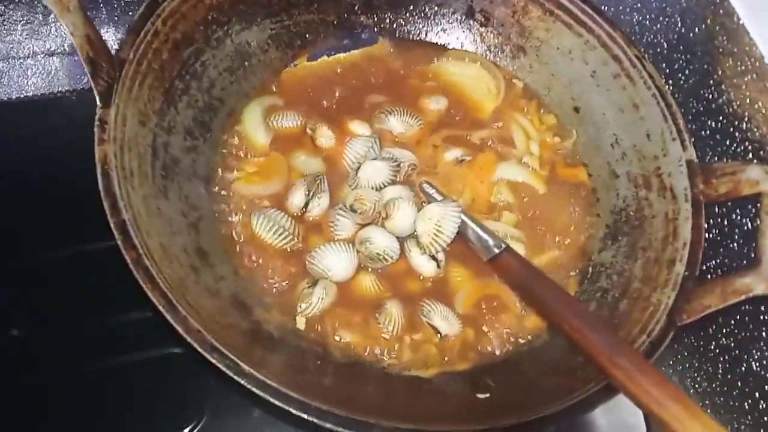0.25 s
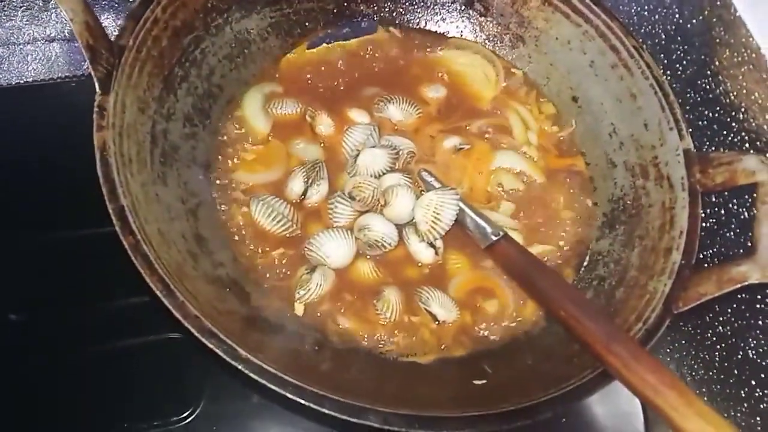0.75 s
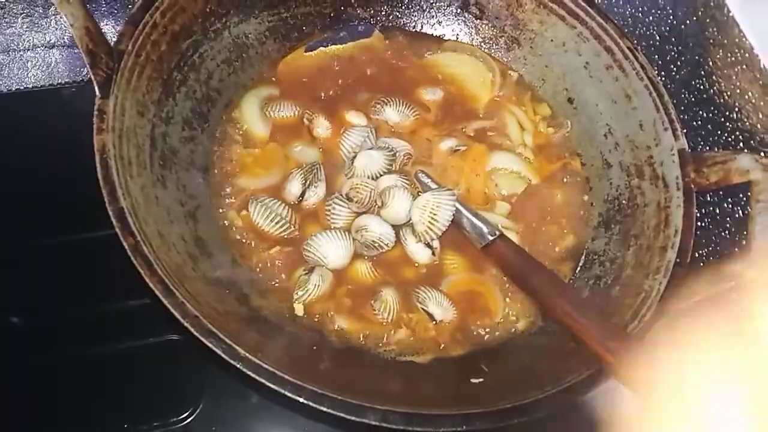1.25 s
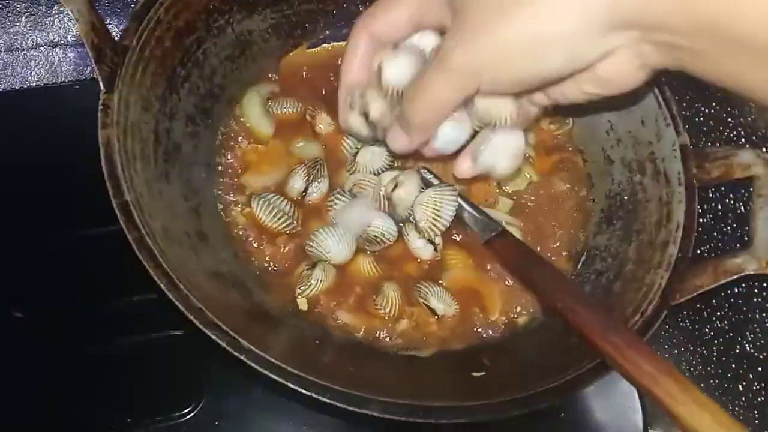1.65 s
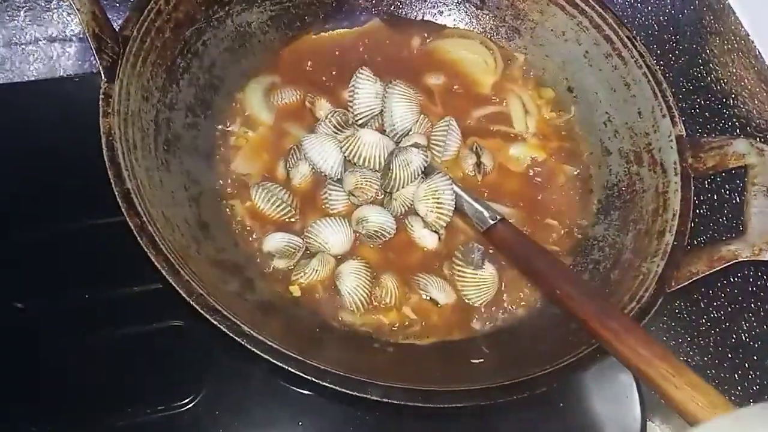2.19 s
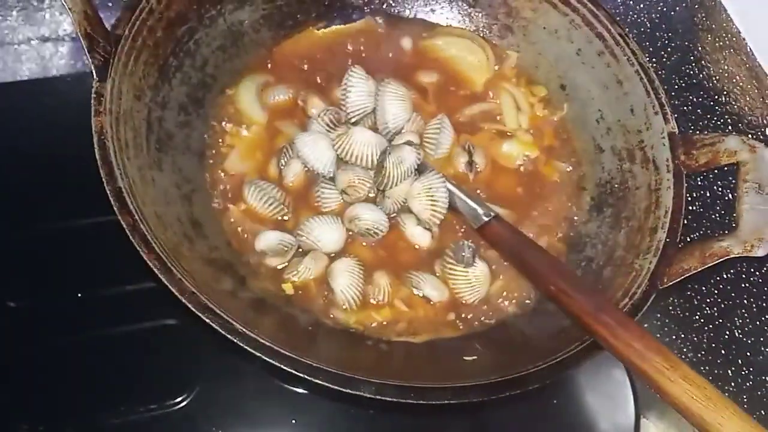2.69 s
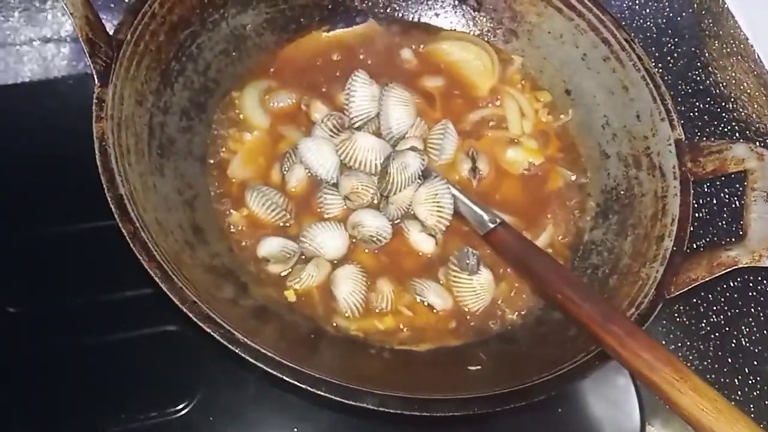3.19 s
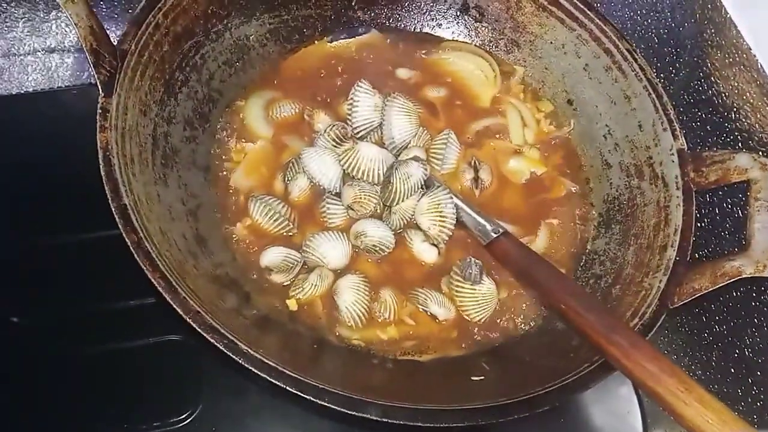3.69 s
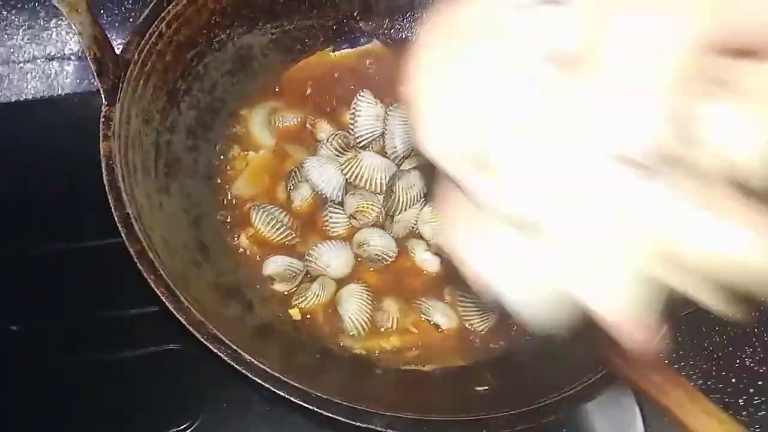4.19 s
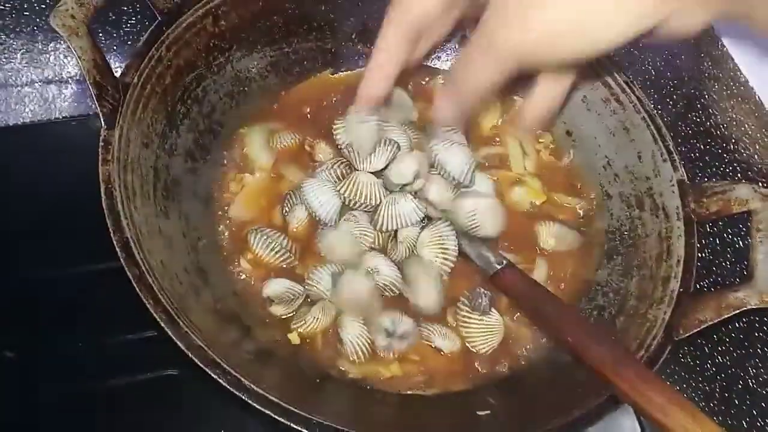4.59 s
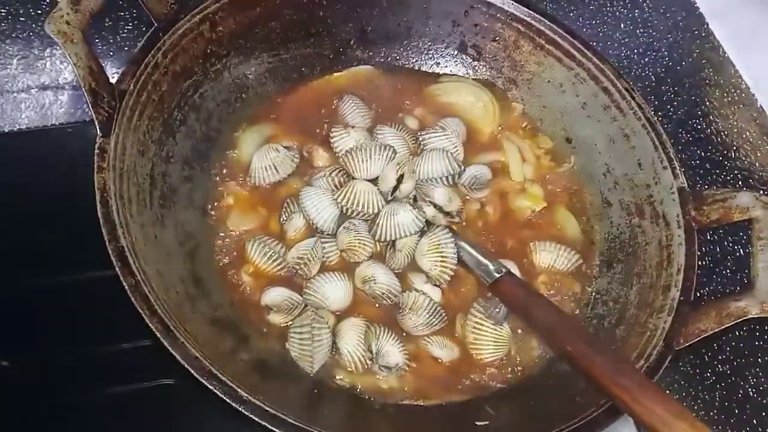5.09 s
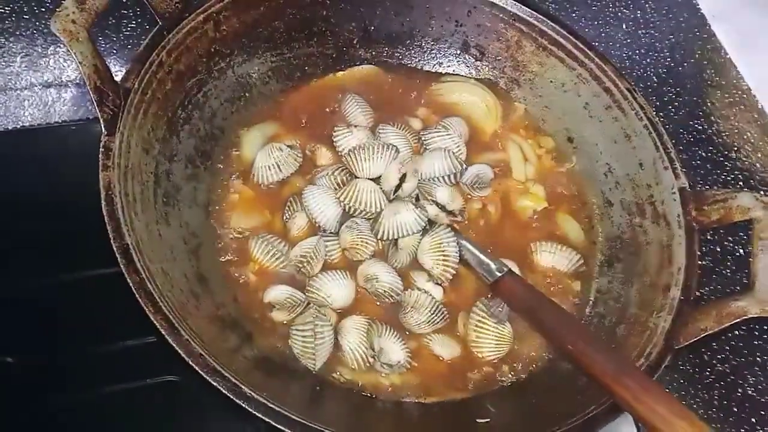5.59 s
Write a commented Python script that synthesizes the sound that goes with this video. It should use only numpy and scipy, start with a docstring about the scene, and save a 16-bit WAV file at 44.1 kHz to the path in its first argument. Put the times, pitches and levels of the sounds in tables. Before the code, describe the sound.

In a small kitchen, a hand digs through cockle shells in a hollow bowl with sharp clacks and dull knocks. After a brief lull of simmering, a handful clatters into a sauce-filled wok. Scooping resumes, a second handful drops with a faint metallic ping, then more digging. Close microphone, short room reverberation.

```python
"""Sauce simmers in a wok in a small kitchen over faint tones while a hand scoops cockles from a bowl:
contacts ring small shells for milliseconds and knock the hollow bowl, which also bumps the counter.
Shells click in the raised hand, then clatter into the sauce-damped wok with low plops.
A second handful is scooped, carried and dropped, one shell pings on the spatula, and scooping resumes.
Damped sines make the rings and bubbles, shaped noise bursts the cracks and thuds."""
import sys
import numpy as np
from scipy import signal
from scipy.fft import rfft, irfft
from scipy.io import wavfile
from scipy.ndimage import uniform_filter1d, minimum_filter1d

SR = 44100
rng = np.random.default_rng(int(sys.argv[2]) if len(sys.argv) > 2 else 0)


def persist_wave(psi):
    """Save psi, clipped to +-1, as 16-bit WAV."""
    counts = np.round(np.clip(psi, -1, 1) * 32767).astype(np.int16)
    wavfile.write(sys.argv[1], SR, np.atleast_2d(counts).T)


N = 257984
T = np.arange(N) / SR
TOP_HZ = 15700


def amp(db):
    """Decibels to gain."""
    return 10 ** (np.asarray(db) / 20)


def unit(x):
    """Scale each row to unit energy."""
    return x / np.sqrt(np.sum(x ** 2, axis=-1, keepdims=True))


def at_hz(points, hz):
    """Read (Hz, value) points on a log-frequency axis."""
    f, value = np.transpose(points)
    return np.interp(np.log(np.maximum(hz, 1)), np.log(f), value)


def colour(points, size=2048):
    """Minimum-phase impulse response with the given spectrum shape, unit energy."""
    log_gain = np.log(amp(at_hz(points, np.fft.rfftfreq(size, 1 / SR))))
    cepstrum = irfft(log_gain)
    # fold the cepstrum to make the response causal
    cepstrum[1:size // 2] *= 2
    cepstrum[size // 2 + 1:] = 0
    return unit(irfft(np.exp(rfft(cepstrum))))


def through(x, response):
    """Pass a sound through an impulse response."""
    return signal.fftconvolve(x, response)[:N]


def high_pass(x, hz):
    """Second-order low cut."""
    return signal.sosfilt(signal.butter(2, hz, "high", fs=SR, output="sos"), x)


def place(times, waves):
    """Sum short waves (one a row) at their start times."""
    index = np.maximum(times * SR, 0).astype(int)[:, None] + np.arange(waves.shape[1])
    return np.bincount(index.ravel(), waves.ravel(), N)[:N]


def bursts(n, t60, size):
    """Decaying noise bursts of unit energy, one a row."""
    decay = amp(-60 * np.arange(size) / SR / t60)
    return unit(rng.standard_normal((n, size)) * decay)


def ring(hz, t60, size):
    """Damped sines of unit energy, one a row."""
    t = np.arange(size) / SR
    decay = np.exp(-np.log(1000) * t / np.reshape(t60, (-1, 1)))
    return unit(np.sin(2 * np.pi * hz[:, None] * t) * decay)


def gesture(start, length, rise, sag, settle):
    """Level/dB of a hand movement: rises up to start, sags (swells if negative), settles; all in dB/s."""
    t = T - start
    return -rise * np.maximum(-t, 0) - sag * np.clip(t, 0, length) - settle * np.maximum(t - length, 0)


# simmering sauce spectrum: f/Hz, relative level/dB
SIMMER_SPECTRUM = [(30, 6), (95, 0), (150, -25), (380, -18), (530, 1.5), (750, -17.5), (1400, -10),
                   (2400, 0.5), (3500, -12), (5300, 2.5), (8000, -13.5), (10500, -11.5), (16000, -30)]
SIMMER_RMS_DB = -46.5
# larger bubbles: t/s, level/dB, f/Hz
BUBBLES = [(2.012, -27, 1020), (3.955, -18, 2000), (4.148, -32, 1500)]


def sauce(count=9000, surge_db=2.5):
    """Tiny bubbles burst in surges, each at its own pitch, over the stove's rush; a few larger ones pop."""
    sizes = amp(8 * np.minimum(rng.standard_normal((count, 1)), 2.0))
    times = rng.random(count) * N / SR
    pops = place(times, sizes * ring(rng.uniform(900, TOP_HZ, count), 0.002, size=200))
    steps = np.arange(0, N / SR, .03)
    surge = amp(surge_db * np.interp(T, steps, rng.standard_normal(len(steps))))
    rush = unit(rng.standard_normal(N))
    fizz = through(unit(surge * pops) + rush, colour(SIMMER_SPECTRUM))
    t, db, hz = np.transpose(BUBBLES)
    larger = place(t, amp(db)[:, None] * ring(hz, 0.021, size=1500))
    return amp(SIMMER_RMS_DB) * np.sqrt(N) * unit(fizz) + larger


# background tones: f/Hz, level/dB, t60/s
HUM_TONES = [(91.1, -73.5, 0.4), (508, -65, 2), (569, -60, 4.5)]
# swells of one further tone: middle t/s, half length/s (to 1/e), peak level/dB
SWELLS = [(1.192, 0.022, -48), (4.06, 0.037, -49), (4.202, 0.016, -52)]
SWELL_HZ = 586


def hum():
    """Noise-driven resonances waver faintly in the background; a further tone swells now and then."""
    hz, db, t60 = np.transpose(HUM_TONES)
    tones = through(rng.standard_normal(N), amp(db) @ ring(hz, t60, size=50000))
    swell = sum(amp(peak_db) * np.exp(-((T - middle) / width) ** 2) for middle, width, peak_db in SWELLS)
    return tones + swell * np.sin(2 * np.pi * SWELL_HZ * T)


# typical shell modes: f/Hz, relative level/dB, t60/s, spread between shells/octaves
SHELL_MODES = [(2538, -6, 0.012, 0.12), (3447, -12.5, 0.016, 0.225), (4680, -3, 0.0042, 0.23),
               (5520, 0, 0.012, 0.13)]
# contact crack spectrum: f/Hz, relative level/dB
CRACK_SPECTRUM = [(60, -41), (1000, -21), (2000, 0.5), (6200, 6.5), (8000, -7.5), (10500, -7),
                  (16000, -26.5)]


def shells(times, sizes, crack_db, variety=1):
    """Shell on shell: a crack, and brief modes whose pitch and share differ with every contact."""
    waves = 0
    for hz, db, t60, spread in SHELL_MODES:
        chance = variety * rng.standard_normal((len(times), 2))
        own_hz = hz * 2 ** (spread * chance[:, 0])
        share = amp(db + 4.4 * chance[:, 1:]) * rng.choice([-1, 1], (len(times), 1))
        waves = waves + share * ring(own_hz, t60, size=400)
    # edge contacts crack sharply, cushioned ones hardly at all
    sharpness = amp(4 * variety * rng.standard_normal(len(times)).clip(-2, 1.5))
    cracks = place(times, (sizes * sharpness)[:, None] * bursts(len(times), 0.0073, size=400))
    rings = high_pass(place(times, sizes[:, None] * unit(waves)), 1320)  # small shells radiate no bass
    # a wet contact lasts a moment, which softens the top of the ring
    rings = signal.sosfilt(signal.butter(2, 8000, fs=SR, output="sos"), rings)
    return rings + amp(crack_db) * through(cracks, colour(CRACK_SPECTRUM))


def knocks(times, db, rattle_db, rattle_s, count=4):
    """One hard contact each, passed on at once to the neighbouring shells."""
    late = (np.arange(count) + rng.random((len(times), count))) / count
    sizes = amp(db + rattle_db)[:, None] * unit(amp(-7 * late))
    after = times[:, None] + 0.000984 + np.reshape(rattle_s, (-1, 1)) * late
    first = shells(times, amp(db), crack_db=-3.0, variety=0.29)
    return first + shells(after.ravel(), sizes.ravel(), crack_db=-1.5)


# dull vessel thud spectrum: f/Hz, relative level/dB
THUD_SPECTRUM = [(30, -50), (150, -36), (320, -8), (430, -6), (900, -3.5), (2000, -8.5), (9000, -31)]


def vessel(times, sizes, modes, thud_db, count=3):
    """Contacts knock a vessel: its modes ring over a dull thud, a little differently at each spot."""
    hz, db, t60 = np.transpose(modes)
    pushes = sizes[:, None] * bursts(len(times), 0.003, size=200)
    out = amp(thud_db) * through(place(times, pushes), colour(THUD_SPECTRUM))
    for spot in range(count):
        chance = rng.standard_normal((2, len(hz)))
        weights = amp(db + 1.53 * chance[0]) * rng.choice([-1, 1], len(hz))
        body = unit(weights @ ring(hz * (1 + 0.022 * chance[1]), t60, size=20000))
        blows = place(times[spot::count], pushes[spot::count])
        out = out + through(blows, high_pass(body, 1.45 * hz[0]))
    return out


def struck(times, db, note_hz, modes, focus_db, thud_db):
    """Firm blows on a vessel: modes lose focus_db for every octave away from the favoured note."""
    hz, mode_db, t60 = np.transpose(modes)
    chance = rng.standard_normal((len(times), 2, len(hz)))
    octaves_off = abs(np.log2(hz / note_hz[:, None]))
    weights = amp(mode_db - focus_db * octaves_off + 2.5 * chance[:, 0]) * np.sign(chance[:, 1])
    sizes = amp(db)[:, None]
    body = place(times, sizes * unit(weights @ ring(hz, t60, size=7000)))
    thud = through(place(times, sizes * bursts(len(times), 0.0062, size=500)), colour(THUD_SPECTRUM))
    return high_pass(body, 1.93 * hz[0]) + amp(thud_db) * thud


CONTACTS_PER_S = 520


def tumble(clatter_db, push_db, modes, shell_db, thud_db, scuff_db, scatter_db):
    """Hundreds of small contacts a second, of varied hardness, knock a vessel; wet shells scuff along."""
    count = int(CONTACTS_PER_S * N / SR)
    times = (np.arange(count) + 2 * rng.random(count) - 1) / CONTACTS_PER_S
    # one shell sets off the next, so contacts in a row are alike in hardness
    chance = unit(uniform_filter1d(rng.standard_normal(count), size=2)) * np.sqrt(count)
    size = unit(amp(scatter_db * np.minimum(chance, 1.7))) * np.sqrt(N)
    clatter = size * amp(np.interp(times, T, clatter_db) + shell_db)
    push = size * amp(np.interp(times, T, push_db))
    # scuffing grows faster than the clatter
    scuff_noise = amp(clatter_db) ** 2.04 * rng.standard_normal(N)
    scuff = amp(scuff_db) * through(scuff_noise, colour(CRACK_SPECTRUM))
    contacts = shells(times, clatter, crack_db=-5.5) + vessel(times, push, modes, thud_db)
    return contacts + high_pass(scuff, 2100)


# loaded bowl modes: f/Hz, relative level/dB, t60/s
BOWL_MODES = [(262, -10, 0.13), (401.7, -3, 0.058), (439.3, -1.5, 0.12), (491.4, -0.5, 0.059),
              (549, -2.5, 0.041), (603, -8, 0.15), (894, -1, 0.041), (1013, -2, 0.048), (1155, -5.5, 0.08),
              (1600, -7, 0.085), (1693, -3.5, 0.096), (2030, -4, 0.04), (2473, 5, 0.01)]
# finger strokes: start t/s, length/s, relative clatter level/dB, bowl push re clatter/dB
DIGS = [(0.0, 0.045, -20, -2.5), (0.121, 0.24, -23, -6), (0.298, 0.08, -24.5, -2.5),
        (0.456, 0.048, -27.5, -10.5), (0.577, 0.048, -21.5, -4), (0.704, 0.11, -17.5, -17.5),
        (0.868, 0.085, -26, -6), (2.218, 0.32, -17, -9), (2.589, 0.09, -16.5, -13),
        (2.757, 0.18, -18, -8.5), (3.028, 0.093, -25, -11), (3.186, 0.04, -21, -8),
        (3.335, 0.1, -28, -11.5), (3.497, 0.053, -21, -12), (3.765, 0.008, -31, -2.5),
        (5.012, 0.06, -17, -12.5), (5.143, 0.057, -16.5, -10.5), (5.257, 0.11, -19.5, -9),
        (5.321, 0.17, -17.5, -10.5), (5.54, 0.36, -18, -10), (5.793, 0.018, -15, -4.5)]
# quick onset, slight swell (negative sag), then the heap comes to rest
DIG_RISE_DB_PER_S, DIG_SAG_DB_PER_S, DIG_SETTLE_DB_PER_S = 740, -2.5, 257
# shell on bowl wall: t/s, relative level/dB, bowl re shell/dB, favoured bowl f/Hz, rattle length/s
BOWL_KNOCKS = [(.038, -3.5, -1.5, 840, 0.0093), (0.0977, -8, 3, 1000, 0.0087),
               (0.157, -6.5, 0, 500, 0.0076), (0.2158, -6.5, -3.5, 1120, 0.0073),
               (.316, -8, 5.5, 480, 0.0075), (.341, -9.5, 9, 447, 0.0084), (0.3742, -8.5, 0, 450, 0.0071),
               (.4, -6.5, 2.5, 500, 0.0053), (0.528, -12.5, 2.5, 1010, 0.0092),
               (0.561, -8, -1.5, 920, 0.0057), (0.623, -15, -2, 550, 0.0038),
               (0.631, -10.5, 4, 1600, 0.0078), (0.655, -3.5, -1.5, 600, 0.005),
               (0.7129, -15, 13, 605, 0.0077), (0.83, -9, 4, 880, 0.0035), (0.862, -12.5, 1.5, 800, 0.0057),
               (0.8816, -8.5, -3, 960, 0.0068), (1.373, -28, -2.5, 1060, .005),
               (2.1994, -9.5, -5, 930, 0.016), (3.208, -10.5, -13, 1000, 0.0051),
               (3.5148, -15.5, 2, 452, 0.0024), (3.5957, -7.5, -10.5, 1010, 0.015),
               (3.7301, -23, 8, 1020, 0.0069), (3.774, -15.5, 3, 1000, 0.012), (3.797, -11, 2, 1050, 0.012),
               (3.97, -24, -0.5, 950, 0.0037), (4.962, -15, 1.5, 754, 0.018), (5.279, -4.5, -4, 725, 0.01)]


def scooping(body_db=0.0):
    """The hand digs through the shells in the bowl, stroke by stroke, and some knock its wall."""
    strokes = np.array([db + gesture(start, length, DIG_RISE_DB_PER_S, DIG_SAG_DB_PER_S, DIG_SETTLE_DB_PER_S)
                        for start, length, db, _ in DIGS])
    pushes = strokes + np.array(DIGS)[:, 3:] + body_db
    rattle = tumble(strokes.max(axis=0), pushes.max(axis=0), BOWL_MODES,
                    shell_db=-5.0, thud_db=-4.5, scuff_db=7.0, scatter_db=3.5)
    t, db, bowl_db, note_hz, rattle_s = np.transpose(BOWL_KNOCKS)
    wall = struck(t, db + bowl_db + 11.0, note_hz, BOWL_MODES, focus_db=11, thud_db=-4.5)
    return rattle + knocks(t, db + 5.5, rattle_db=6.5, rattle_s=rattle_s) + wall


# heap shoved along the bowl wall: middle t/s, length/s, relative level/dB, favoured f/Hz
SHOVES = [(0.059, 0.072, -24.5, 490), (0.36, 0.078, -29, 454), (0.743, 0.041, -26, 865),
          (2.427, 0.32, -28, 900), (2.48, 0.1, -27, 534), (2.899, 0.11, -23, 564), (5.371, 0.082, -25, 860),
          (5.421, 0.12, -23.5, 470), (5.634, 0.15, -25, 504), (5.809, 0.08, -29, 500)]


def shoving(count=24):
    """Ribbed shells stick and slip on the bowl wall and draw out the hollow modes near one note."""
    middle, length, db, note_hz = np.transpose(SHOVES)[:, :, None]
    along = (np.arange(count) + rng.random((len(SHOVES), count))) / count
    sizes = amp(db) * unit(np.sqrt(np.sin(np.pi * along))) * np.sqrt(length * SR)
    slips = middle + length * (along - .5)
    slip_db = 20 * np.log10(sizes.ravel())
    return struck(slips.ravel(), slip_db, np.repeat(note_hz, count), BOWL_MODES, focus_db=11.5, thud_db=-21)


# hard shell-on-shell clacks: t/s, relative level/dB, note f/Hz
CLACKS = [(0.281, -7.5, 2820), (0.435, -3.5, 5500), (0.453, 1.5, 2760), (0.5081, -3, 5400),
          (0.782, -4, 5740), (0.9358, -7, 2730), (1.035, -19.5, 2450), (1.6217, -16, 5100),
          (1.635, -9, 2450), (1.653, -13, 6550), (1.665, -3, 4940), (1.688, -3.5, 5440), (1.712, -10, 2320),
          (1.726, -10, 5600), (1.745, -7, 2380), (1.762, -8.5, 4840), (1.773, -6, 5470),
          (1.817, -0.5, 5180), (2.558, -2, 5610), (2.728, 1.5, 5370), (2.9744, -2, 5700),
          (3.0077, -4.5, 5980), (3.085, -6.5, 2430), (3.119, -9.5, 5560), (3.1315, -5.5, 4320),
          (3.2925, -5, 2440), (3.318, -5, 5300), (3.356, -7, 2590), (3.396, -12.5, 5000), (3.55, -7, 5500),
          (3.6499, -7, 4770), (3.673, -7.5, 6050), (3.68, -9, 5400), (3.7302, -4, 5620), (4.324, -2, 5800),
          (4.35, -3.5, 5370), (4.3654, -3.5, 5100), (4.413, -8, 5660), (4.424, -7, 5430), (4.472, -5, 2400),
          (4.505, -6, 5200), (4.539, -10, 4970), (4.564, -10, 5700), (4.613, -14.5, 5660),
          (4.624, -12, 5360), (4.7338, -6.5, 5330), (5.003, -7, 4400), (5.153, -1.5, 5620),
          (5.17, -11, 5900), (5.201, 4.5, 5940), (5.329, -3, 5530), (5.366, 3, 5830), (5.443, -9, 5800),
          (5.483, -21, 5800), (5.5326, -2, 5600)]
CLACK_NOTE_DB, CLACK_BODY_DB, CLACK_T60_S = 7, -6, 0.013  # levels re clack


def clacking():
    """Single shells snap against neighbours: a brief note of their own, a dull knock from the heap below."""
    t, db, hz = np.transpose(CLACKS)
    notes = place(t, amp(db + CLACK_NOTE_DB)[:, None] * ring(hz, CLACK_T60_S, size=600))
    blows = place(t, amp(db + CLACK_BODY_DB)[:, None] * bursts(len(t), CLACK_T60_S, size=600))
    heap = through(blows, colour(THUD_SPECTRUM))
    return knocks(t, db + 5.5, rattle_db=-3.5, rattle_s=.007) + notes + high_pass(heap, 320)


# counter modes: f/Hz, relative level/dB, t60/s
COUNTER_MODES = [(60.6, -2, 0.07), (92.5, -5, 0.078), (242, 5, 0.012)]
# bowl on counter: t/s, relative level/dB
BUMPS = [(0.454, -16.5), (0.657, -23), (2.364, -26), (4.963, -17.5)]


def bumping():
    """The digging hand rocks the bowl against the counter, whose low modes thump softly."""
    t, bump_db = np.transpose(BUMPS)
    hz, db, t60 = np.transpose(COUNTER_MODES)
    thump = unit(amp(db) @ ring(hz, t60, size=8000))
    return place(t, amp(bump_db + 11.5)[:, None] * thump)


# shells shifting in the raised hand: t/s, relative level/dB, rattle length/s
HAND_CLICKS = [(1.211, -25.5, .003), (1.264, -29.5, .007), (1.278, -31.5, .002), (1.285, -36, .002),
               (1.393, -42, .006), (1.457, -23.5, .009), (1.535, -29, .012), (2.181, -41, .012),
               (3.985, -40, .004), (4.062, -40, .006), (4.131, -38.5, .004), (4.221, -34, .008),
               (4.27, -24, .012), (4.284, -22, .012)]


def carrying():
    """Shells click in the hand: thin, with no vessel under them, and the fingers muffle their top."""
    t, db, rattle_s = np.transpose(HAND_CLICKS)
    clicks = knocks(t, db + 16, rattle_db=6.5, rattle_s=rattle_s)
    return signal.sosfilt(signal.butter(2, [2800, 6800], "band", fs=SR, output="sos"), clicks)


PLOP_DB = -17  # re push on the wok


def plops(push_db, hz=300, octaves=0.42, t60=0.065, count=1100):
    """Shells plunge into the thick sauce: many low, quickly damped bubbles."""
    times = (np.arange(count) + rng.random(count)) / count * N / SR
    chance = rng.standard_normal((2, count))
    sizes = amp(np.interp(times, T, push_db) + 2 * chance[0]) * np.sqrt(N / count)
    bubbles = ring(hz * 2 ** (octaves * chance[1]), t60, size=3000)
    return high_pass(place(times, sizes[:, None] * bubbles), 204)


# sauce-damped wok modes: f/Hz, relative level/dB, t60/s
WOK_MODES = [(106, -0.5, 0.12), (277, 3.5, 0.079), (422, -0.5, 0.28), (736, 5, 0.056), (954, 5.5, 0.017),
             (1276, -1, 0.016), (1520, 3.5, 0.0048), (2250, 7, 0.023)]
# handfuls: bulk lands t/s, length/s, relative clatter level/dB, finger opening rate/(dB/s)
HANDFULS = [(1.728, 0.098, -18, 137), (4.474, 0.18, -17.5, 88)]
# the fall thins out while it lasts, then the heap settles
FALL_SAG_DB_PER_S, FALL_SETTLE_DB_PER_S = 76, 218
# the wok is pushed from before the bulk to after it
WOK_PUSH_DB, WOK_LEAD_S, WOK_LAG_S = -33.5, 0.057, 0.021
# shell through to the wok: t/s, relative level/dB, wok re shell/dB, favoured wok f/Hz, rattle length/s
WOK_KNOCKS = [(1.5545, -1.5, -5, 676, 0.028), (1.6212, -7, -2, 900, .004), (1.8759, -11, 5.5, 485, 0.01),
              (2.009, -23.5, 10.5, 990, 0.0032), (4.322, -28, -3, 950, 0.006),
              (4.351, -17, 6.5, 800, 0.0041), (4.4483, -4.5, -3.5, 700, .005),
              (4.6625, -4, -6, 1300, 0.0024), (4.6968, -3.5, 2.5, 1040, .009),
              (4.7329, -19, 11, 810, 0.0079), (4.785, -28, 3, 1300, .003)]
# one shell pings on the steel spatula
PING_S, PING_HZ, PING_DB, PING_T60_S = 4.736, 3262, -8, 0.17


def dropping():
    """A few shells slip out ahead; then the handful lands on the heap and in the sauce."""
    clatter = [db + gesture(start, length, rise, FALL_SAG_DB_PER_S, FALL_SETTLE_DB_PER_S)
               for start, length, db, rise in HANDFULS]
    pushes = [WOK_PUSH_DB + gesture(start - WOK_LEAD_S, WOK_LEAD_S + length + WOK_LAG_S,
                                    rise=210, sag=6.9, settle=164)
              for start, length, _, _ in HANDFULS]
    push_db = np.max(pushes, axis=0)
    rattle = tumble(np.max(clatter, axis=0), push_db, WOK_MODES,
                    shell_db=-5.5, thud_db=-4.5, scuff_db=-4, scatter_db=2.5)
    t, db, wok_db, note_hz, rattle_s = np.transpose(WOK_KNOCKS)
    pan = struck(t, db + wok_db + 3.0, note_hz, WOK_MODES, focus_db=7, thud_db=-17.5)
    ping = place(np.array([PING_S]), amp(PING_DB) * ring(np.array([PING_HZ]), PING_T60_S, size=8000))
    hits = knocks(t, db + 0.5, rattle_db=0.0, rattle_s=rattle_s)
    return rattle + hits + pan + ping + plops(push_db + PLOP_DB)


# kitchen reverberation: f/Hz, t60/s
KITCHEN_T60 = [(150, 0.45), (2000, 0.34), (14000, 0.076)]


def wall_tail(size=20000, count=9):
    """The short tail of the walls as heard from one spot; the treble dies first."""
    t = np.arange(size) / SR
    hz = np.fft.rfftfreq(size, 1 / SR)
    edges = np.append(0, np.geomspace(200, SR / 2, count))
    noise = rfft(rng.standard_normal(size))
    tail = 0
    for lo, hi in zip(edges, edges[1:]):
        band = irfft(noise * ((hz >= lo) & (hz < hi)))
        tail = tail + band * np.exp(-np.log(1000) * t / at_hz(KITCHEN_T60, (lo + hi) / 2))
    return unit(tail * (t > .006))


def kitchen(x, early_db, tail_db, count=5):
    """Near surfaces answer within milliseconds, walls leave a tail; both vary from moment to moment."""
    step = 1024
    padded = np.pad(x, (0, 2 * step))
    frames = np.lib.stride_tricks.sliding_window_view(padded, 2 * step)[::step]
    moments = frames * np.hanning(2 * step)
    starts = np.arange(len(moments)) * step / SR
    surfaces = unit(bursts(len(moments), 0.019, step) * (T[:step] > .001))
    early = place(starts, signal.fftconvolve(moments, surfaces, axes=1))
    # successive moments take turns through the wall tails
    tail = sum(through(place(starts[spot::count], moments[spot::count]), wall_tail()) for spot in range(count))
    return x + amp(early_db) * early + amp(tail_db) * tail


def scene():
    """Handling in the kitchen, plus sauce and background tones, at one microphone."""
    handling = scooping() + shoving() + bumping() + clacking() + carrying() + dropping()
    return (kitchen(handling, early_db=-4.0, tail_db=-8) + sauce() + hum())[None]


def record(dry):
    """The recorder thins the bass, ducks for an instant at the highest peaks and cuts the top."""
    ceiling = .68
    thinned = high_pass(dry, 120)
    gain = ceiling / np.maximum(abs(thinned), ceiling)
    limited = thinned * uniform_filter1d(minimum_filter1d(gain, size=45), size=45)
    return signal.sosfilt(signal.ellip(10, .2, 80, TOP_HZ, fs=SR, output="sos"), limited)


dry = scene()
out = record(dry)
persist_wave(out)
```